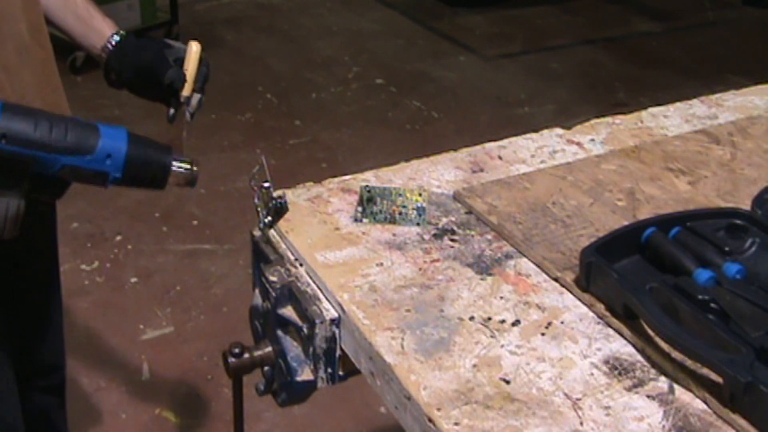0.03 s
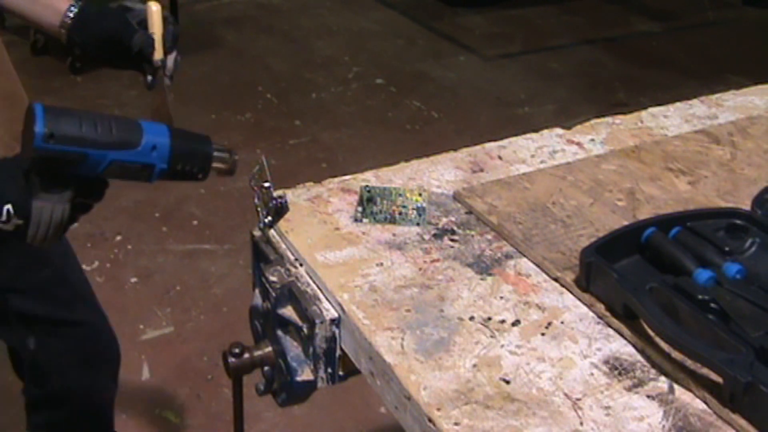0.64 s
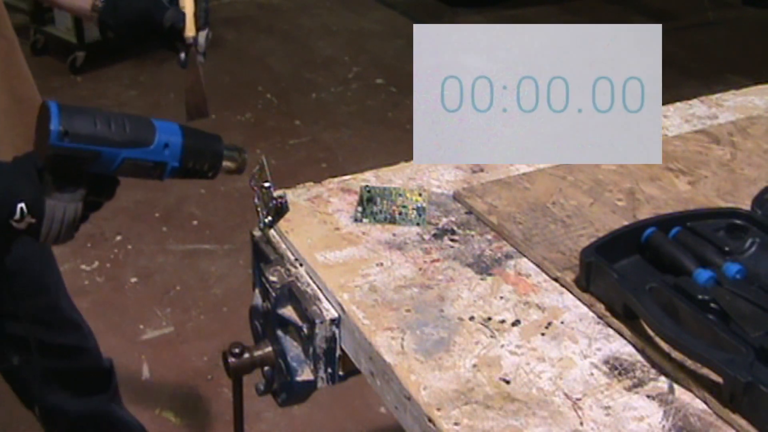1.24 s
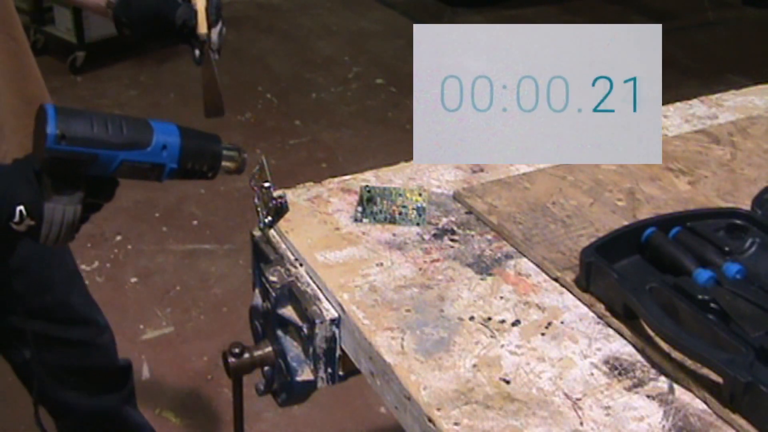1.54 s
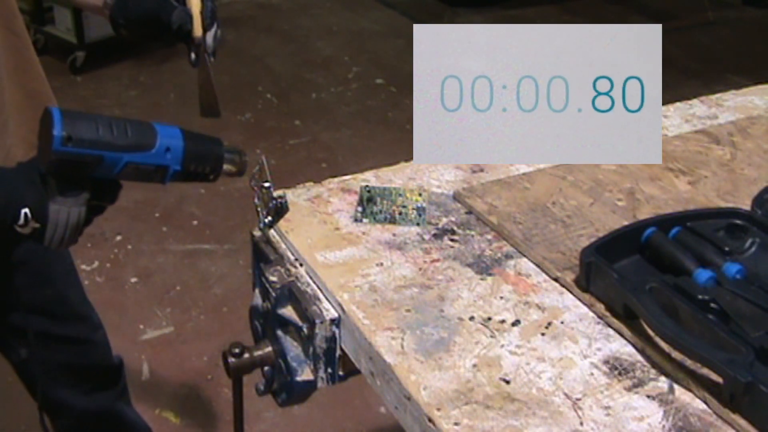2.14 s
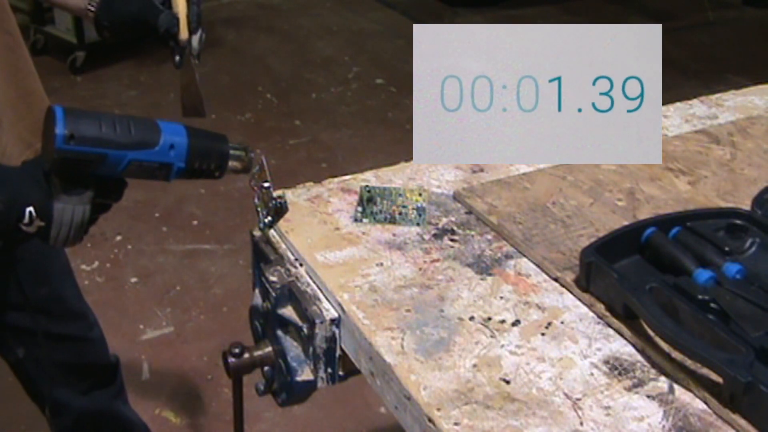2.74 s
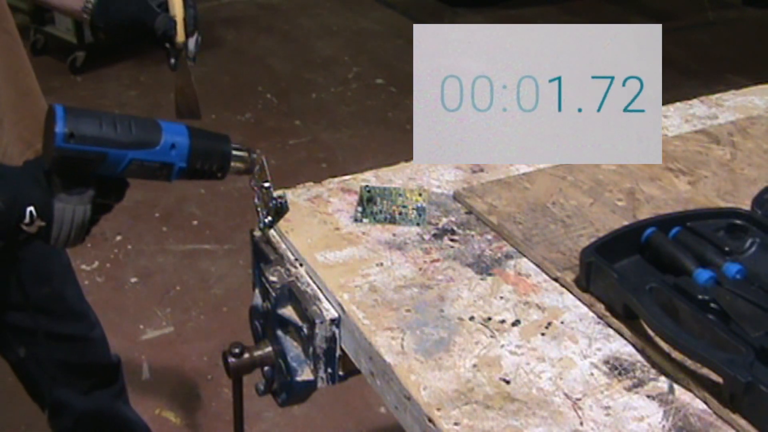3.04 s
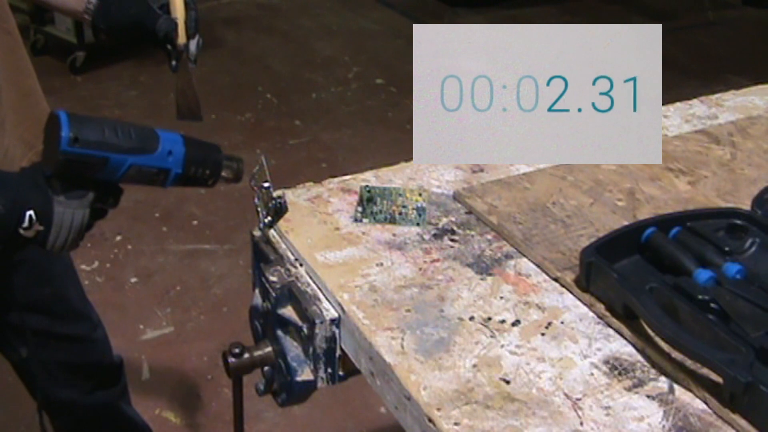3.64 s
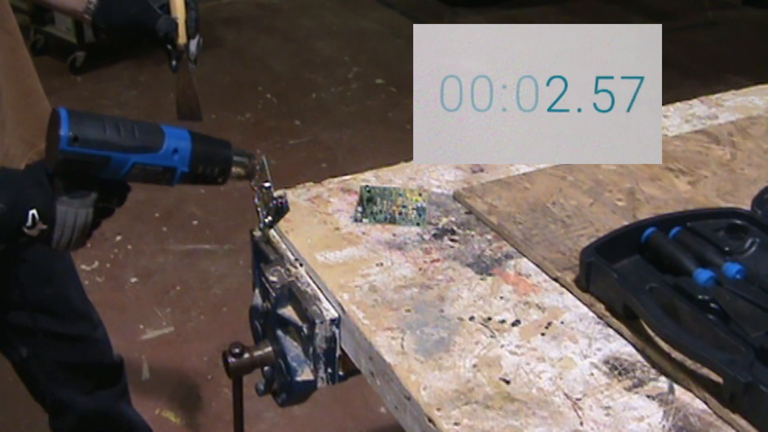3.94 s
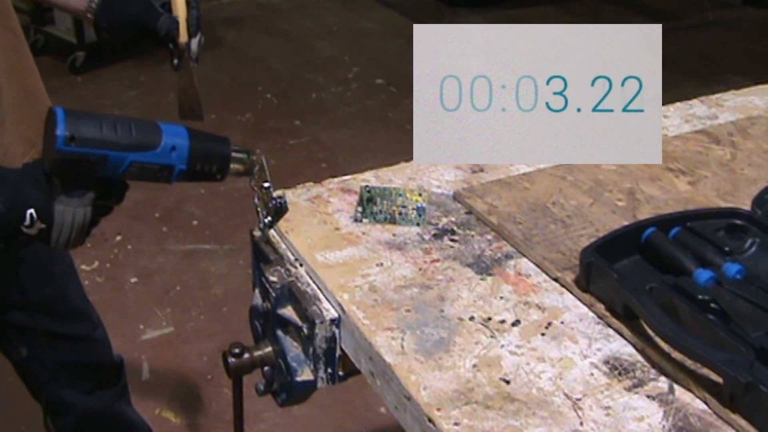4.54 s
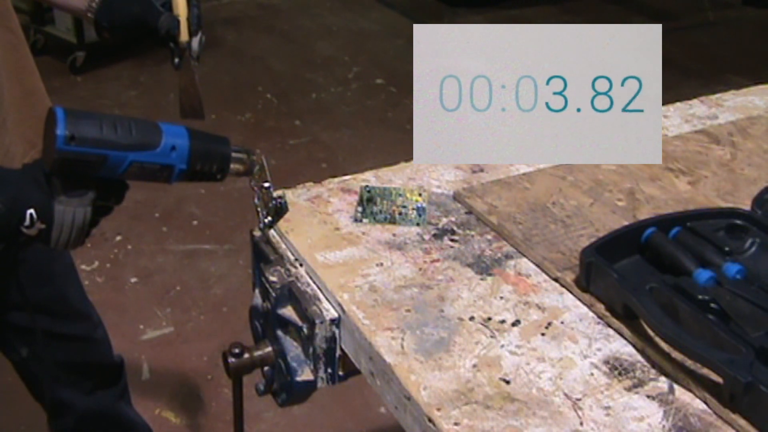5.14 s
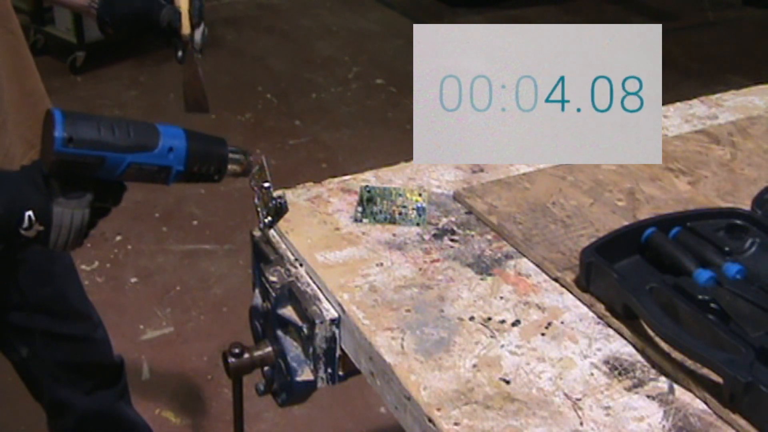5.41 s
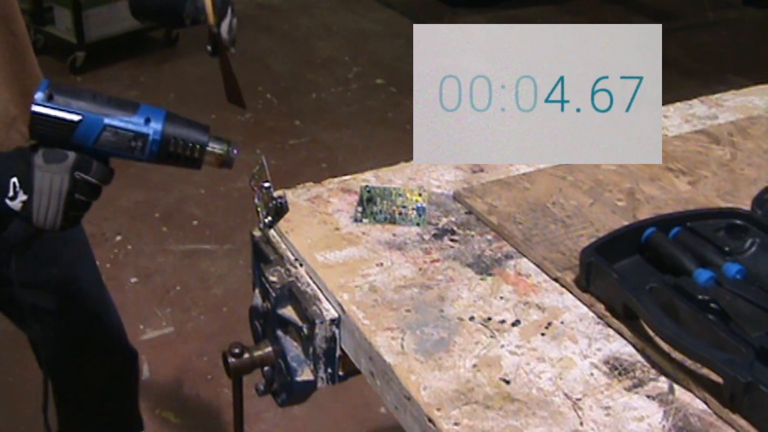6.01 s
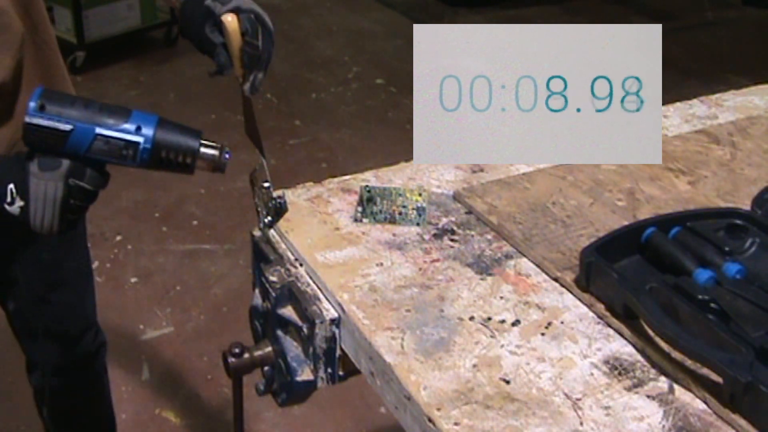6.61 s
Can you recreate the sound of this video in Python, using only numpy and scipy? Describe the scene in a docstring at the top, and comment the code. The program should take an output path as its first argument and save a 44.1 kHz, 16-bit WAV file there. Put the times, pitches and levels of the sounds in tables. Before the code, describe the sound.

An electric heat gun spins up with a brief rasp, then blows steadily with a whine, motor buzz and rushing air.

```python
"""A rising whine and a brief rasp open the sound as an electric heat gun spins up to 320 turns a second.
Held over a workbench, it then blows steadily: the five-bladed fan sounds harmonics of the shaft rate,
the small motor buzzes on rectified mains, and turbulent air rushes from the nozzle over a low rumble.
The strong tones swell and fade as the hand moves the gun through the workshop's standing waves.
At the end the sound is cut off."""
import sys
import numpy as np
from scipy import signal
from scipy.fft import rfft, irfft, next_fast_len
from scipy.io import wavfile

SR = 44100
rng = np.random.default_rng(int(sys.argv[2]) if len(sys.argv) > 2 else 0)


def store_wav(level_fs):
    """Save 16-bit WAV to argv[1]."""
    pcm = np.round(np.clip(np.atleast_2d(level_fs), -1, 1) * 32767)
    wavfile.write(sys.argv[1], SR, pcm.T.astype(np.int16))


N = 302685
T = np.arange(N) / SR
RIPPLE_PHASE = 2 * np.pi * 120 * T  # rectified mains pulses at 120 Hz


def undb(db):
    """Amplitude ratio of a level in decibels."""
    return 10 ** (np.asarray(db) / 20)


def curves(rows):
    """Linear interpolation in time of each value column of a table."""
    times, *columns = np.transpose(rows)
    return [np.interp(T, times, column) for column in columns]


def contour(points, hz):
    """Spectral envelope: gain through (frequency [Hz], level [dB]) points on a logarithmic axis."""
    frequencies, db = np.transpose(points)
    return undb(np.interp(np.log(hz), np.log(frequencies), db))


def resonances(modes, hz):
    """Modal response: steep-skirted resonances add in power."""
    return np.sqrt(sum((undb(db) / (1 + ((hz - f * f / hz) / (1.7 * width)) ** 2)) ** 2
                       for f, width, db in modes))


def bumps(rows, hz):
    """Resonance and antiresonance: gain of bell-shaped peaks and dips that add in decibels."""
    return undb(sum(db * .5 ** ((2 * (hz - f) / width) ** 2) for f, width, db in rows))


def walk(rate):
    """Band-limited fluctuation with spread near 1, drawn from rate random values a second."""
    knots = rng.standard_normal(int(N / SR * rate) + 4)
    fine = signal.resample_poly(knots, 12, 1)
    return np.interp(T * rate, np.arange(len(fine)) / 12, fine)


def flutter(steady_db, rate, sweep_db=1.7, settle_s=.8):
    """Random flicker in dB, standing for the beats of a tone with its echoes; deepest in the run-up."""
    return (steady_db + sweep_db * np.exp(-T / settle_s)) * walk(rate)


def pan(db):
    """Interaural level difference: channel gains for a left-minus-right level."""
    return undb(np.array([[db], [-db]]) / 2)


def noise(colour):
    """Diffuse field: partly coherent stereo noise of rms 1, spectrally shaped by colour(hz)."""
    # diffuse sound between the ears: (frequency [Hz], side minus mid [dB])
    width = [(60, -22.5), (150, -13), (380, -16.5), (1300, -15), (4000, -14.5), (8000, -21)]
    size = next_fast_len(N, real=True)
    hz = np.maximum(np.fft.rfftfreq(size, 1 / SR), 1)
    mid, side = rfft(rng.standard_normal((2, size))) * colour(hz)
    side = side * contour(width, hz)
    stereo = irfft([mid + side, mid - side], size)[:, :N]
    return stereo / stereo.std()


def tone(angle, spread_db=-19, sway=.3):
    """Interaural phase difference: wall echoes bring a tone of rms near 1 to one ear slightly early."""
    side = undb(spread_db) * rng.choice([-1, 1]) * np.cos(angle + sway * walk(1))
    mid = np.sin(angle)
    return np.sqrt(2) * np.array([mid + side, mid - side])


def throbbing_tone(angle, depth):
    """Amplitude modulation by the supply pulses; each tone's path gives tone and throb a random phase."""
    start, lag = rng.uniform(0, 2 * np.pi, 2)
    return tone(angle + start) * (1 + depth * np.cos(RIPPLE_PHASE + lag))


def standing_wave(place_cm, node_cm, spacing_cm, echo):
    """Interference of a tone with its echo: the gain is least at a node, greatest midway to the next."""
    return np.abs(1 - echo * np.exp(2j * np.pi * (place_cm - node_cm) / spacing_cm))


def rumble(level_db=-35.5):
    """Room modes shape steady noise into a low rumble."""
    # low resonances of the workshop: (frequency [Hz], width [Hz], relative level [dB])
    room_modes = [(27, 7.4, -4.5), (44, 13, -3.5), (70.6, 9.7, 2), (91, 14, -4), (108, 12, 2.5),
                  (128, 22, -3.5), (150.1, 8, 1.5), (242, 30, -13)]
    return noise(lambda hz: resonances(room_modes, hz)) * undb(level_db) * pan(-1.2)


def rasp(turn, chop=.92, flicker_db=1):
    """Friction excitation: the rotor rubs once a turn and rings the housing until it is up to speed."""
    # resonances of the housing: (frequency [Hz], width [Hz], relative level [dB])
    housing_modes = [(1410, 300, 4.5), (1910, 300, -4), (3400, 250, -13.5), (8000, 1500, -22),
                     (12800, 700, -27.5)]
    # decay of the rubbing: (time [s], level [dB])
    rub_levels = [(0, -34), (.3, -36.5), (.6, -40), (1, -43), (1.6, -60)]
    rub = noise(lambda hz: resonances(housing_modes, hz)) * (1 + chop * np.sin(turn))
    return rub * undb(curves(rub_levels)[0] + flicker_db * walk(25))


def air(turn, air_db, hiss_db, level_db=-29, chop=.07, throb=.025, gust_db=.38, cut_hz=155, hiss_hz=4200):
    """Turbulence makes broadband noise, filtered by the barrel and lightly chopped by the rotor."""
    # flow through grille and nozzle: (frequency [Hz], relative spectral level [dB])
    flow_spectrum = [(200, -2), (260, -3.5), (400, -10), (560, -8), (720, 1), (1100, -1.5), (1750, -2),
                     (2400, -4), (3700, -6.5), (4700, -11.5), (6400, -11), (9500, -19), (12000, -28.5),
                     (15500, -35.5)]
    # peaks and dips of barrel and nozzle: (frequency [Hz], width [Hz], gain [dB])
    barrel = [(474, 30, 4.5), (895, 80, -1), (1170, 100, -2), (1448, 72, 4), (1560, 130, -0.5),
              (1722, 58, 6), (2230, 110, -2.5), (2680, 200, -2.5), (2790, 120, 2.5), (3380, 110, 2.5),
              (5230, 250, -2.5), (6690, 220, 1), (7050, 600, -3), (7750, 250, 2)]
    rush = noise(lambda hz: contour(flow_spectrum, hz) * bumps(barrel, hz) / (1 + (cut_hz / hz) ** 8))
    # the nozzle beams its treble, so the hiss changes with the aim
    hiss = signal.sosfiltfilt(signal.butter(2, hiss_hz, "highpass", fs=SR, output="sos"), rush)
    rush = rush + (undb(hiss_db) - 1) * hiss
    pulsing = 1 + chop * np.sin(2 * turn) + throb * np.cos(RIPPLE_PHASE)
    return rush * pulsing * undb(level_db + air_db + gust_db * walk(8)) * pan(.36)


def buzz(turn, buzz_db, fade_db=3, drift=.5):
    """Commutation makes weak shaft harmonics; standing waves give each a random level and phase drift."""
    # weak tones of motor and fan: (shaft multiple, base level [dB])
    harmonics = [(4, -46), (8, -48), (13, -48.5), (16, -57.5), (17, -52), (18, -56), (19, -55.5),
                 (22, -55.5), (24, -54.5), (25, -54), (26, -56), (27, -59.5), (28, -54.5), (29, -56),
                 (30, -60.5), (31, -59), (32, -61), (33, -62.5), (34, -62), (36, -63.5), (39, -69),
                 (40, -65), (41, -69), (43, -68), (45, -69), (46, -68), (47, -69.5), (48, -68.5)]
    out = 0
    for multiple, db in harmonics:
        gain = undb(db + buzz_db + fade_db * walk(3.5))
        out = out + gain * throbbing_tone(multiple * turn + drift * walk(3), depth=.25)
    return out


def whistle(turn, multiple=12, flutter_db=.84, drift=.3):
    """The motor's whistle is one high shaft harmonic, amplitude-modulated by the supply."""
    # swell and fade of the whistle: (time [s], level [dB])
    levels = [(0, -51), (.15, -36.5), (.45, -38), (.8, -47), (1.3, -38), (1.9, -34), (2.25, -37),
              (2.55, -32.5), (3, -36), (3.5, -32), (3.8, -37.5), (4.25, -30.5), (5.9, -32.5), (6.08, -41)]
    angle = multiple * turn + drift * walk(1.5)
    return throbbing_tone(angle, depth=.11) * undb(curves(levels)[0] + flutter(flutter_db, 20))


def whine(turn, shaft_hz, octaves, flutter_db=.72, drift=.3, aside_s=5.86, aside_length_s=.27):
    """Strong shaft harmonics vary with speed, flare at resonances and fade at standing-wave nodes."""
    # the hand brings the gun up to the work and twitches once: (time [s], place along its path [cm])
    hand_path = [(0.0, 5.7), (0.3, 5.7), (0.55, 9.5), (0.85, 10), (1.25, 12.8), (1.7, 16), (2.0, 16.7),
                 (2.4, 17.3), (3.1, 18.1), (3.5, 18.7), (3.72, 22.6), (4.1, 19.1), (4.9, 19.3), (5.5, 20.4),
                 (5.85, 19.5), (6.1, 20)]
    # strong tones, each in its own standing wave: (shaft multiple, base level [dB],
    # growth [dB per doubling of speed], node place [cm], node spacing [cm], echo amplitude [0-1],
    # change during the swing aside [dB])
    harmonics = [(1, -39.5, 61, .1, 12.96, .69, .5), (2, -36, 90, 11.5, 13.8, 0.16, -1),
                 (3, -36, 50, 5.22, 7.2, .4, -5.5), (6, -40, 30, 8.4, 11.8, .38, -3.5),
                 (7, -42.5, -32, 3.4, 14.2, .36, 2.5), (9, -38.5, 70, 12.2, 59.3, .58, -6),
                 (10, -36, 71, 11, 59.9, .54, 4), (11, -36.7, 90, 5.4, 14.4, .45, -6),
                 (14, -44.5, 70, 1.8, 6.5, .55, -1), (15, -42.5, 70, 7, 12.5, .46, 6.5),
                 (20, -50.5, -6, 5.4, 8.6, .5, 0), (21, -46, -12, 5.2, 17.1, .75, -7),
                 (23, -50, 30, 5.9, 6.5, 0.5, 6)]
    # narrow resonances in the way of the rising tones: (frequency [Hz], width [Hz], gain [dB])
    flares = [(925, 28, 6), (3120, 25, 7.5), (3420, 30, 4), (4700, 22, 8.5), (6530, 55, 9.5)]
    place_cm = curves(hand_path)[0]
    aside = .5 ** ((2 * (T - aside_s) / aside_length_s) ** 2)  # near the end the gun swings aside
    hz = np.arange(SR / 2)
    flare = bumps(flares, hz)
    out = 0
    for multiple, db, growth_db, node_cm, spacing_cm, echo, aside_db in harmonics:
        gain = undb(db + growth_db * octaves + aside_db * aside + flutter(flutter_db, 14))
        gain *= standing_wave(place_cm, node_cm, spacing_cm, echo)
        gain *= np.interp(multiple * shaft_hz, hz, flare)
        out = out + gain * throbbing_tone(multiple * turn + drift * walk(1.5), depth=.11)
    return out


def blade_tone(turn, blades=5, flutter_db=.5, ripple=.19, swing_rad=.17):
    """The blade-passing tone, roughened as the supply pulses modulate its amplitude and phase."""
    # deep swells and fades of the tone: (time [s], level [dB])
    levels = [(0, -30.5), (.22, -33), (.35, -38.5), (.63, -26), (.8, -33), (1.25, -31), (1.38, -25),
              (1.55, -31), (2, -25.5), (2.33, -26), (2.48, -39), (2.8, -34), (3.02, -38.5), (3.55, -35),
              (3.75, -25), (4.27, -34.5), (4.5, -26.5), (4.82, -30), (5.18, -23), (5.62, -22), (5.8, -32.5),
              (6.05, -20.5), (6.2, -22.5)]
    angle = blades * turn + swing_rad * np.sin(RIPPLE_PHASE)
    rough_tone = tone(angle) * (1 + ripple * np.cos(RIPPLE_PHASE))
    return rough_tone * undb(curves(levels)[0] + flutter(flutter_db, 30))


def scene(full_hz=320.82, unsteady_hz=.083, air_growth_db=8.5, buzz_growth_db=42):
    """Superposition: one shaft drives the tones, the chopped air and the rasp, over the room's rumble."""
    # slow changes of the treble: (time [s], nozzle hiss gain [dB], motor buzz gain [dB])
    treble = [(0, -1, 0.5), (.55, 0, 2.8), (1.4, -.5, 0.5), (2.2, 1, 1.7), (3, -.5, .5), (3.55, 1.5, -2),
              (3.78, -1, 1), (4, 1, -1), (6.2, -.5, 0)]
    hiss_db, buzz_db = curves(treble)
    # the motor runs up quickly, then creeps the last few turns a second to full speed
    shaft_hz = full_hz - 60.1 * np.exp(-T / .186) - 7.07 * np.exp(-T / 1.46)
    octaves = np.log2(shaft_hz / full_hz)  # growth settings are in dB per octave of speed
    turn = 2 * np.pi * np.cumsum(shaft_hz + unsteady_hz * walk(25)) / SR  # shaft angle [rad]
    tones = blade_tone(turn) + whistle(turn) + whine(turn, shaft_hz, octaves)
    tones += buzz(turn, buzz_db + buzz_growth_db * octaves)
    return tones + air(turn, air_growth_db * octaves, hiss_db) + rasp(turn) + rumble()


def record(dry, end_s=6.22, top_hz=15750):
    """Phase shift makes the left channel lag in the bass; the sound stops dead and is band-limited."""
    # phase between the two microphone ports: (frequency [Hz], lead of the left [rad])
    port_phase = [(20, -.25), (80, -.45), (180, -.7), (400, -0.69), (700, -0.55), (1100, -0.5),
                  (1700, -0.37), (3500, .08), (9000, -0.067)]
    size = next_fast_len(N, real=True)
    hz = np.maximum(np.fft.rfftfreq(size, 1 / SR), 1)
    frequencies, radians = np.transpose(port_phase)
    lead = np.interp(np.log(hz), np.log(frequencies), radians) * np.array([[.5], [-.5]])
    heard = irfft(rfft(dry, size) * np.exp(1j * lead), size)[:, :N]
    lowpass = signal.ellip(10, .1, 80, top_hz, fs=SR, output="sos")
    return signal.sosfilt(lowpass, heard * (T < end_s))


dry = scene()
out = record(dry)
store_wav(out)
```